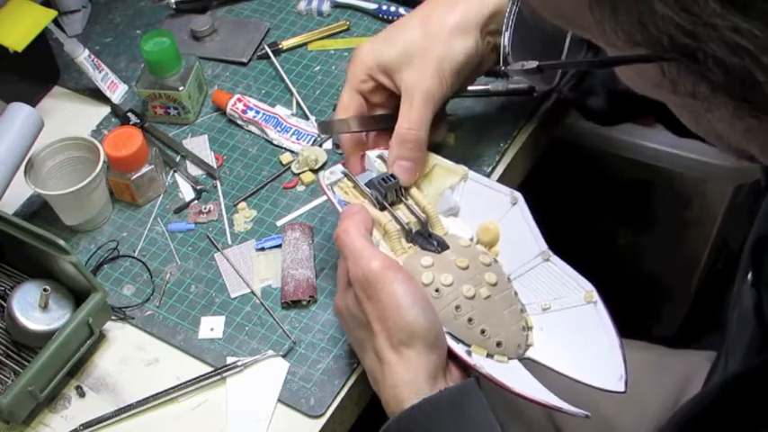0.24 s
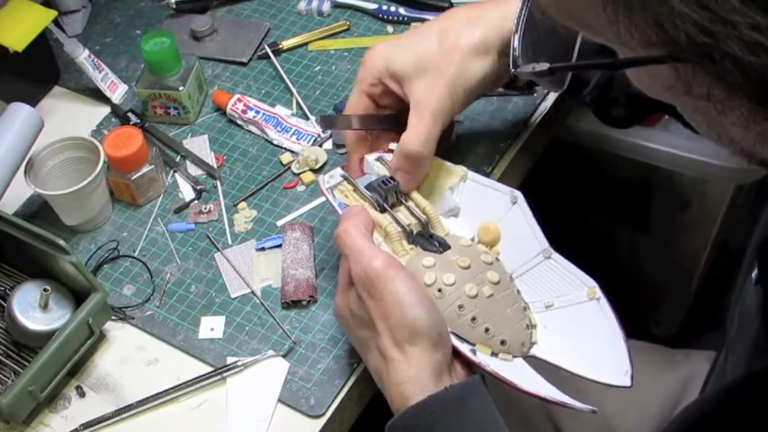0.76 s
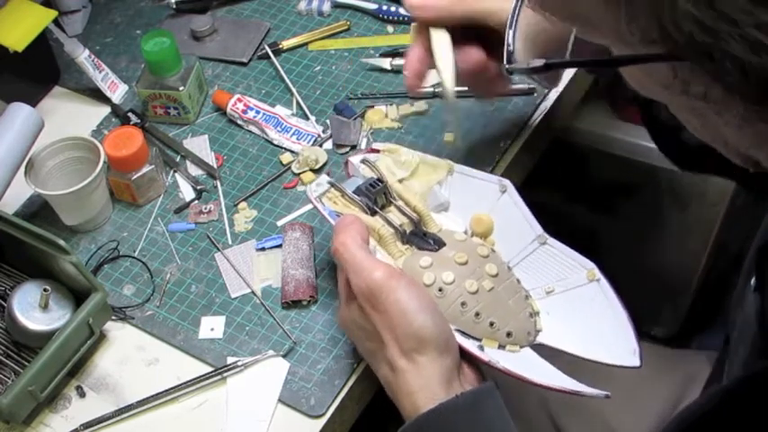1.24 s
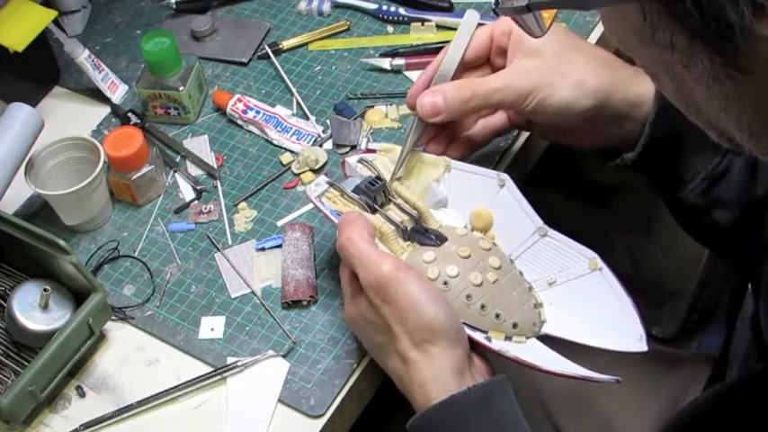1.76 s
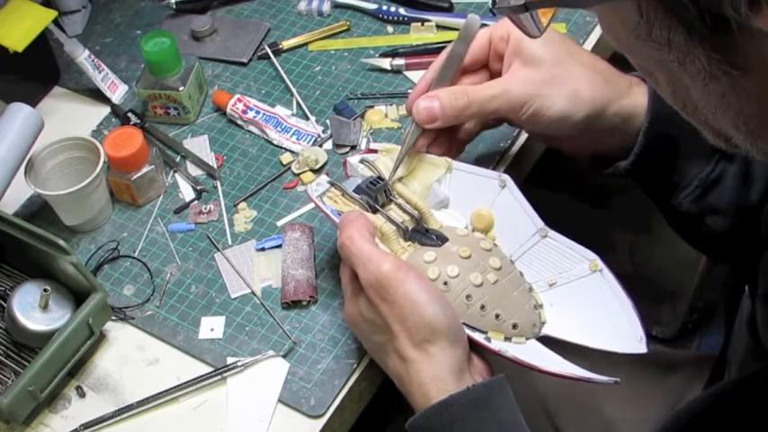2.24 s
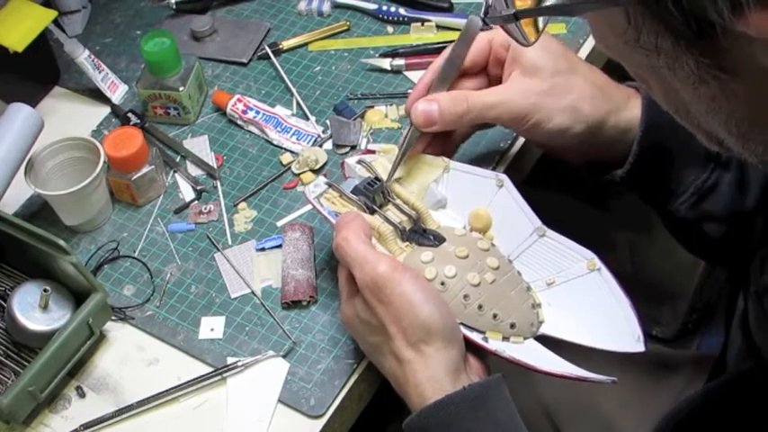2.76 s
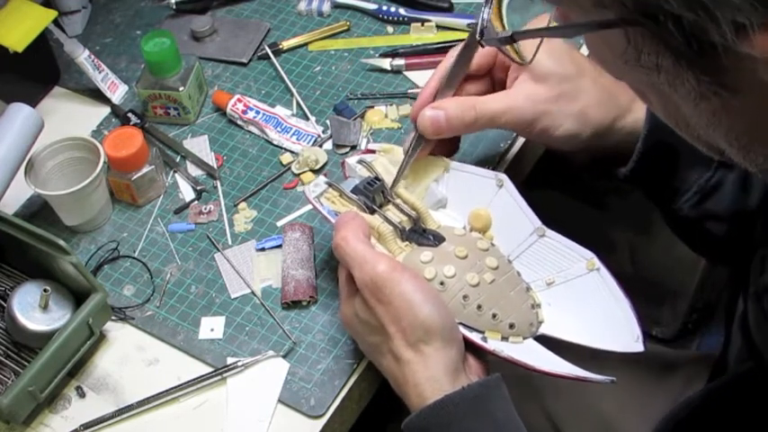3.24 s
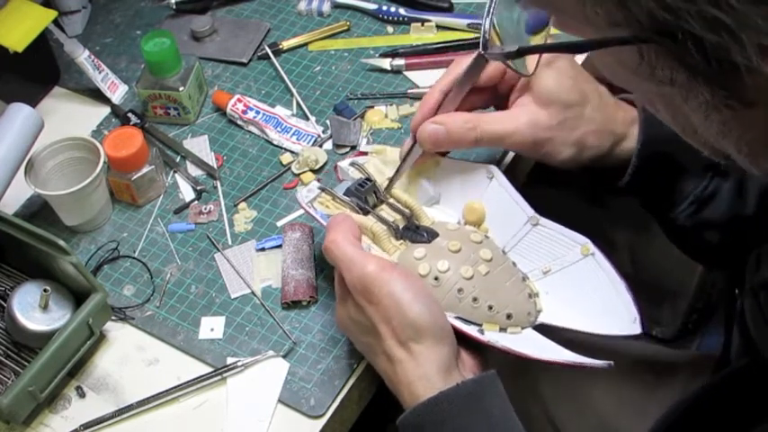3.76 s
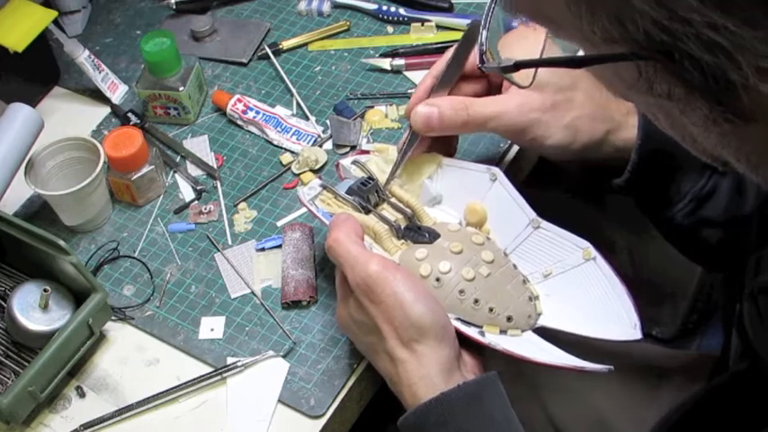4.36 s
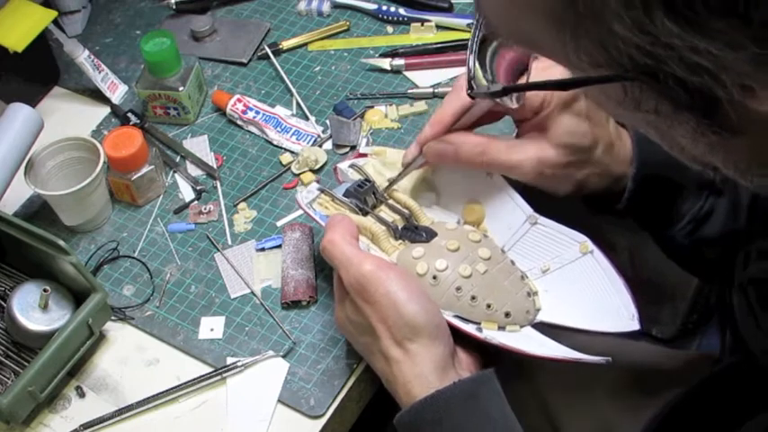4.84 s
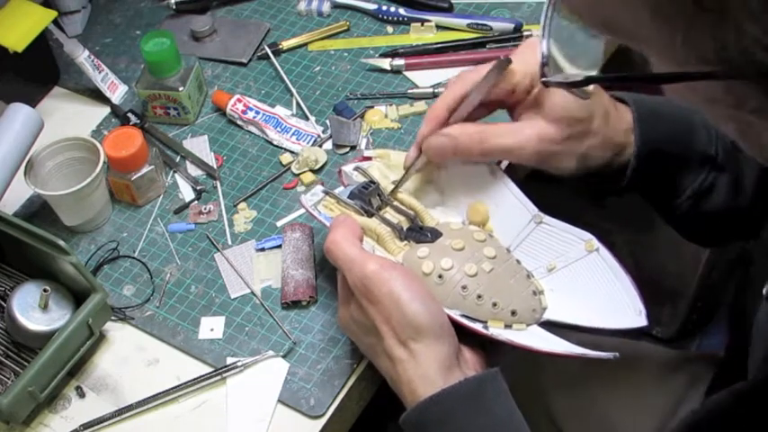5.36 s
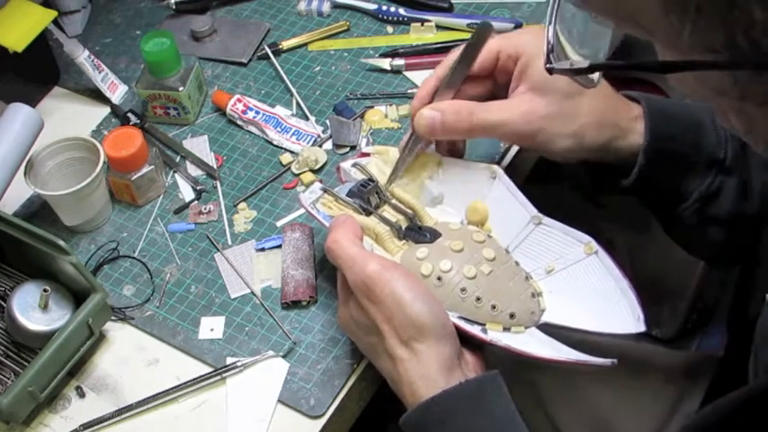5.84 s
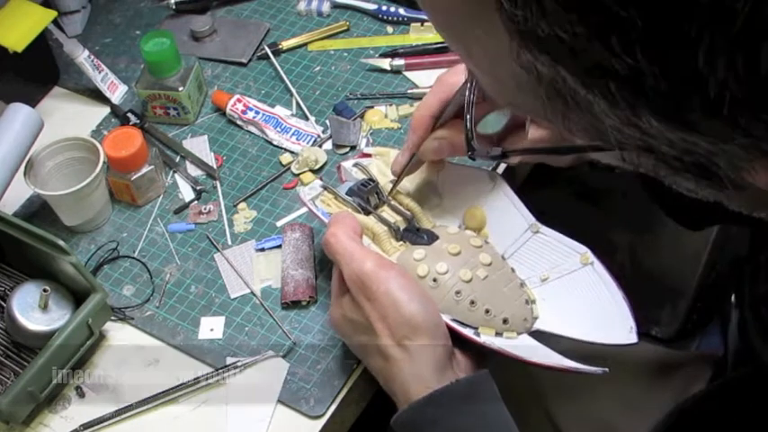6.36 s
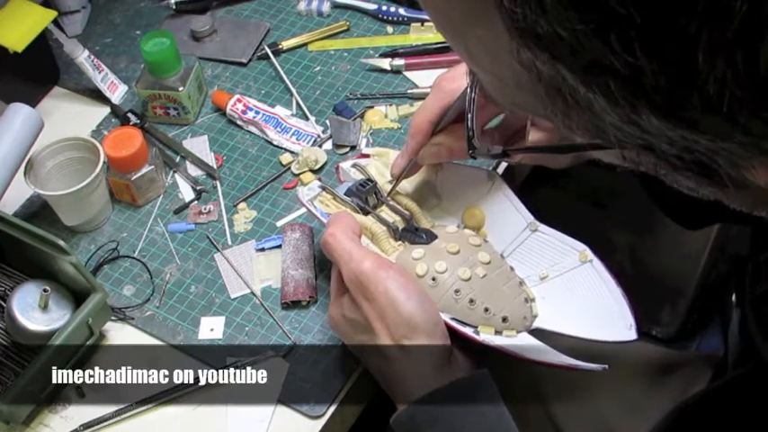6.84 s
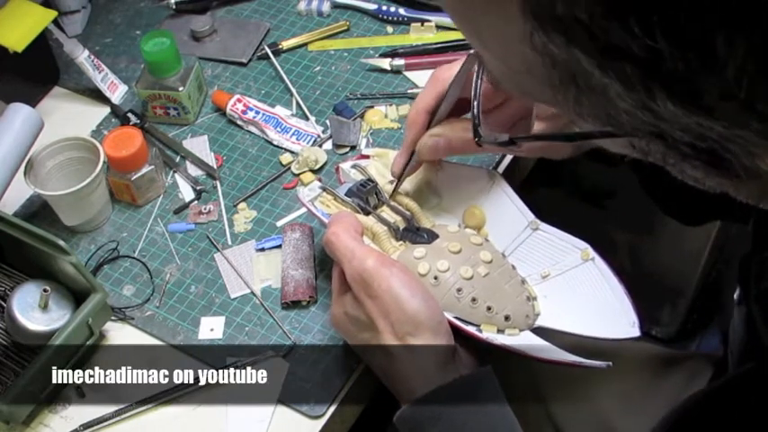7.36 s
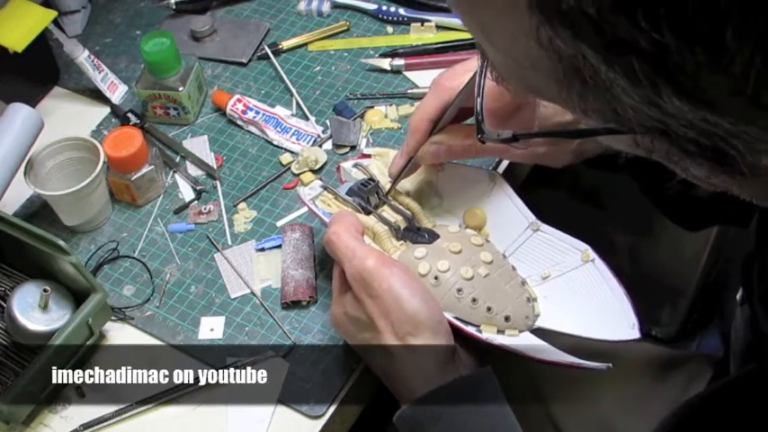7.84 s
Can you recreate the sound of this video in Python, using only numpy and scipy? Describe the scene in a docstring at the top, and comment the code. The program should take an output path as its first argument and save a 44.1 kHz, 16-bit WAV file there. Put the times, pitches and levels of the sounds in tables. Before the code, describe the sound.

Close, dry tweezer taps on a thin plastic shell, scattered and irregular, with one loud rattling burst near the end over low room hum.

```python
"""A quiet room hums, rumbles and hisses, with a thin throbbing whistle near the top of hearing.
Soon steel tweezers tap and nudge a hollow plastic model held over a desk.
Each contact is a short rough force that rings the shell and the steel, with a noisy crack and near echoes.
Fingers, tips and cloth rub faintly: uneven slips ring the shell, and cloth is a bright hiss.
Some contacts also thump the desk, a soft push that rings its low modes."""
import sys
import numpy as np
from scipy import signal
from scipy.io import wavfile

SR = 44100
rng = np.random.default_rng(int(sys.argv[2]) if len(sys.argv) > 2 else 0)


def dump(signal):
    """Clip the signal to [-1, 1] and save it as 16-bit WAV at the path in sys.argv[1]."""
    limited = np.clip(np.atleast_2d(signal).T, -1, 1)
    pcm = np.round(limited * 32767).astype(np.int16)
    wavfile.write(sys.argv[1], SR, pcm)


N = 357165   # length in samples

# Room noise colour, relative between bands: f/Hz, level per Hz/dB
ROOM_COLOUR = [(60, -25), (85, -11), (130, -3.5), (200, -3), (305, -5), (450, -6.5), (800, -10.5),
               (1150, -14), (2200, -24), (4320, -27.5), (9000, -29.5), (14000, -32.5), (15500, -40),
               (17000, -42)]
# How alike left and right are in the room noise: f/Hz, likeness (1 same, 0 unrelated, below 0 opposed)
ROOM_LIKENESS = [(60, 1), (110, 0.97), (200, 0.73), (380, -0.52), (700, -0.6), (1290, -0.21), (2380, 0.47),
                 (4400, 0.24), (8120, 0.083), (15000, -0.031)]
# Deep rumble that swells and sinks: t/s, level/dB
RUMBLE_LEVEL = [(0.0, -62), (0.34, -56), (1.2, -58.5), (1.58, -56), (1.8, -64), (2.14, -52), (2.4, -56),
                (2.95, -63), (3.74, -53), (4.35, -65), (4.9, -58), (5.32, -56), (5.89, -58), (6.56, -62),
                (6.95, -64), (7.26, -56), (7.67, -65), (8.1, -57)]
# Low hum tones, most of them multiples of the 50 Hz mains: f/Hz, rms level/dB
HUM_TONES = [(50, -59.5), (100, -66.5), (150, -67.5), (200, -77.5), (300, -67.5), (525, -80.5)]
# Tweezer contacts: t/s, shell level/dB, then crack, bright edge and low modes (each level/dB
# relative to the shell), favoured shell pitch f/Hz, contact time/s
CONTACTS = [(0.178, -54, 3, -13.5, 4, 1560, 0.017), (0.699, -50.5, -1, 0, -11, 2630, 0.0072),
            (0.944, -43.5, -16, -28, -1, 2640, 0.01), (0.954, -38, -4.5, -25, -5, 2350, 0.0039),
            (0.964, -38, -26, -8, -11, 1790, 0.0036), (1.639, -48.5, -13, -10, -3, 1030, 0.006),
            (1.998, -52, -12, -2, -2, 1020, 0.021), (2.306, -60, 9.5, 10, -4, 805, 0.012),
            (2.631, -42.5, -26, -23, -7, 1070, 0.0058), (2.654, -51.5, -16, -16, 2, 2470, 0.012),
            (2.824, -43, -18, 3, -5, 1040, 0.012), (2.831, -43.5, 1, -4, 0, 1800, 0.02),
            (2.873, -50.5, 2, 0, -11, 1220, 0.036), (3.41, -44.5, -0.5, -9, 0, 1090, 0.012),
            (3.434, -39.5, -9, -22, -0.5, 950, 0.0065), (3.926, -60, 7, -3, -5, 2080, 0.022),
            (4.2, -51.5, -6, -6, 1, 1020, 0.0056), (4.602, -39, 7.5, -2.5, -11, 1180, 0.01),
            (4.763, -48.5, 4.5, 3, -9, 2500, 0.0076), (4.864, -26, 2, -2.5, -11.5, 1650, 0.0054),
            (5.114, -22.5, -4.5, -14, -8.5, 1280, 0.01), (5.344, -19, 0.5, -9, -8, 1630, 0.013),
            (5.587, -47, -13, -16, -6, 1070, 0.012), (5.607, -53, 5, -1.5, -5, 1070, 0.015),
            (5.627, -45.5, 0, -13.5, -13, 1920, 0.018), (5.649, -48.5, -6, -16, -8, 1090, 0.013),
            (5.685, -46.5, -1, -15, -11, 1790, 0.012), (5.729, -48.5, -4.5, -5.5, 6.5, 1770, 0.0088),
            (6.03, -37, 14, 8, -4.5, 1500, 0.024), (6.04, -34, 9.5, -30, -10, 2720, 0.02),
            (6.069, -39, -4, 3, -18, 1050, 0.0063), (6.293, -48.5, 5.5, -8.5, -12, 1890, 0.018),
            (7.066, -17.5, -11, -1.5, -3, 1100, 0.015), (7.069, -15, 4, 4.5, -14, 2580, 0.0036),
            (7.076, -20, 3, -1, -4, 1030, 0.017), (7.115, -20, -0.5, 0, 1, 940, 0.0048),
            (7.124, -29, 8.5, 3.5, 6, 1800, 0.017), (7.352, -37.5, 3, -7, -3, 1060, 0.016),
            (7.704, -56, -4, -12, -5, 2140, 0.015), (7.785, -57, -9.5, -11.5, -2, 1770, 0.014),
            (7.818, -51, -13, -13, -5, 1020, 0.0092), (7.895, -53.5, 2, -3.5, 4, 2150, 0.016),
            (8.011, -44.5, 0.5, -19, -3, 1020, 0.0098), (8.058, -43.5, 3, -9, -7, 1150, 0.011)]
# Ringing modes of the plastic shell: f/Hz, relative level/dB, time to fall 60 dB/s
SHELL_MODES = [(424, -10.5, 0.13), (540, -1, 0.083), (563, -33, 0.16), (827, -14.5, 0.19),
               (1012, -11, 0.16), (1096, 0.5, 0.071), (1500, -39, 0.032), (1690, -33, 0.06),
               (1795, -9.5, 0.14), (1890, -0.5, 0.036), (1964, -3.5, 0.049), (2144, 0, 0.04),
               (2418, 2, 0.017), (2680, -12, 0.17), (3400, -19, 0.021)]
# Ringing modes of the tweezers, damped by the fingers: f/Hz, relative level/dB, time to fall 60 dB/s
STEEL_MODES = [(4530, 2.5, 0.036), (5180, -0.5, 0.038), (5460, -24, 0.066), (6730, -5.5, 0.046),
               (8230, -25, 0.041), (9100, -37, 0.026), (10880, 0, 0.063), (12140, -23, .04)]
# Fingers and tips rubbing the shell: peak t/s, peak level/dB
SHELL_RUBS = [(0.948, -47.5), (3.928, -57), (4.08, -57.5), (4.318, -57.5), (5.65, -58), (5.686, -56),
              (6.3, -51), (7.9, -53)]
# Cloth brushing: peak t/s, peak level/dB
CLOTH_RUBS = [(1.092, -65), (1.412, -62), (1.496, -73)]
# Contacts that reach the desk: t/s, level/dB, depth/dB per octave (above 0 favours the low modes)
DESK_THUMPS = [(4.862, -51, 1), (5.115, -44.5, -8), (5.343, -49.5, 14), (6.029, -51, 4), (6.068, -53, -0.5),
               (7.066, -37, -5), (7.07, -31.5, -2), (7.076, -30, -11), (7.115, -35.5, -12), (7.124, -37, 0),
               (7.352, -49, -2), (3.434, -58, -8), (8.012, -57, -2)]
# Ringing modes of the desk: f/Hz, relative level/dB, time to fall 60 dB/s
DESK_MODES = [(68.8, 0.5, 0.28), (119.5, 2.5, 0.34), (168.6, -7, 0.25), (221.7, -5.5, 0.15)]

ROOM_DB, ROOM_PATCHY_DB = -53.5, 1.1
WHISTLE_HZ, WHISTLE_DB = 15734, -69.5   # level before the beat and the dip
WHISTLE_BEAT_HZ, WHISTLE_BEAT_DEPTH, WHISTLE_BEAT_PEAK_S = 13.51, 0.5, 0.069
WHISTLE_DIP_S, WHISTLE_DIP_WIDTH_S, WHISTLE_DIP_DB = 6.05, 0.13, -15   # the whistle sinks away once
FAINT_TONE_HZ, FAINT_TONE_DB = 6480, -85
ECHO_T60_S, ECHO_PER_CONTACT = 0.1, 2.9   # near echoes last longer after a longer touch
RUB_RISE_DB_PER_S, RUB_FALL_DB_PER_S = 500, 248
CLOTH_RISE_DB_PER_S, CLOTH_FALL_DB_PER_S = 150, 300
THUMP_CUT_HZ = 44   # the thumps lose their deepest bass below this
CUTOFF_HZ = 17100   # the top is fully cut from here up


def from_db(db):
    """Turn decibels into gain."""
    return 10 ** (np.asarray(db) / 20)


def rms_one(x):
    """Scale a sound to an rms level of 1."""
    return x / np.sqrt(np.mean(x ** 2) + 1e-20)


def band(x, low, high):
    """Keep mainly the pitches between two frequencies."""
    return signal.sosfilt(signal.butter(2, [low, high], "band", fs=SR, output="sos"), x)


def at_hz(points, hz):
    """Read a table at one frequency, in straight lines on a log-frequency axis."""
    table_hz, value = np.transpose(points)
    return np.interp(np.log(hz), np.log(table_hz), value)


def drift(rate_hz):
    """Slow random wandering with a typical size of 1, made every 40 samples and joined by lines."""
    r = np.exp(-80 * np.pi * rate_hz / SR)
    noise = rng.standard_normal(N // 40 + 2002)
    slow = signal.lfilter([1], [1, -2 * r, r * r], noise)[2000:]   # skip the filter's start
    return np.interp(np.arange(N) / 40, np.arange(len(slow)), rms_one(slow))


def spread(mid, side, alike):
    """Make left and right from two noises: what they share, plus what they hold in opposite signs."""
    alike = np.clip(alike, -1, 1)
    shared = np.sqrt((1 + alike) / 2) * mid
    opposed = np.sqrt((1 - alike) / 2) * side * [[1], [-1]]
    return shared + opposed


def level(rows):
    """Gain over time from rows of time and decibels."""
    s, level_db = np.transpose(rows)
    return from_db(np.interp(np.arange(N) / SR, s, level_db))


def swells(rows, rise_db, fall_db):
    """Gain that climbs to each peak and falls away at steady decibels per second."""
    t = np.arange(N) / SR
    gain = 0
    for s, db in rows:
        below_peak_db = np.where(t < s, rise_db * (s - t), fall_db * (t - s))
        gain = gain + from_db(db - below_peak_db)
    return gain


def octaves(modes, hz):
    """How many octaves each mode lies above a pitch."""
    return np.log2(np.array(modes)[:, 0] / hz)


def ring(force, modes, weights_db):
    """Drive ringing modes side by side with one force; each is a decaying tone with its own weight."""
    out = 0
    for (hz, level_db, t60), weight_db in zip(modes, weights_db):
        r = from_db(-60 / (t60 * SR))   # loss per sample
        w = 2 * np.pi * hz / SR
        mode = signal.lfilter([0, np.sin(w)], [1, -2 * r * np.cos(w), r * r], force)
        out = out + from_db(level_db + weight_db) * mode
    return out


def room_noise(patchy_db):
    """Half-octave bands of stereo noise, each wavering a little, over a deep rumble."""
    out = 0
    edges = 85 * 2 ** np.arange(0, 8.1, .5)
    white = rng.standard_normal((2, 2, N))
    for k, (low, high) in enumerate(zip(edges, edges[1:])):
        hz = np.sqrt(low * high)
        gain = from_db(at_hz(ROOM_COLOUR, hz) + patchy_db * drift(8.8))
        mid, side = band(white[k % 2], low, min(high, .45 * SR))   # neighbours use separate noises
        out = out + gain * spread(mid, side, at_hz(ROOM_LIKENESS, hz))
    bed = from_db(ROOM_DB) * out / np.std(out.mean(axis=0))
    rumble = rms_one(band(white[1, 0], 40.3, 90))
    return bed + level(RUMBLE_LEVEL) * rumble


def tones():
    """Sine tones: a wavering low hum, a throbbing whistle and a faint wavering tone below it."""
    t = np.arange(N) / SR
    hum = 0
    for hz, db in HUM_TONES:
        gain = from_db(db + 1.6 * drift(3.1))
        hum = hum + gain * np.sin(2 * np.pi * (hz * t + rng.random()))
    beat = 1 + WHISTLE_BEAT_DEPTH * np.cos(2 * np.pi * WHISTLE_BEAT_HZ * (t - WHISTLE_BEAT_PEAK_S))
    dip_db = WHISTLE_DIP_DB * np.exp(-((t - WHISTLE_DIP_S) / WHISTLE_DIP_WIDTH_S) ** 2)
    whistle = from_db(WHISTLE_DB + dip_db) * beat * np.sin(2 * np.pi * WHISTLE_HZ * t)
    faint = from_db(FAINT_TONE_DB + 2 * drift(8)) * np.sin(2 * np.pi * FAINT_TONE_HZ * t)
    return np.sqrt(2) * (hum + whistle + faint)   # turns rms levels into sine peaks


def tap(shell_db, crack_db, edge_db, boom_db, shell_hz, contact_s):
    """One contact: a rough force rings shell and steel, with a noisy crack and its near echoes."""
    t = np.arange(SR // 4) / SR
    noise = rng.standard_normal((3, 2, len(t)))

    # the touch sets in quickly and fades, with grip and slip about a millisecond at a time
    touch = (1 - np.exp(-t / 0.00068)) * np.exp(-(t / contact_s) ** 2)
    slips = np.repeat(rng.standard_normal(len(t) // 40 + 1), 40)[:len(t)]
    touch = touch * from_db(1.4 * slips)
    force = 0.76 * rms_one(noise[0, 0] * touch) / np.sqrt(len(t))
    force[20] += .6   # the first hard strike

    # the struck spot favours modes near its centre; modes below 700 Hz get their own level
    spot_db = -10.5 * octaves(SHELL_MODES, shell_hz) ** 2
    spot_db = np.where(octaves(SHELL_MODES, 700) < 0, boom_db, spot_db)
    luck_db = rng.normal(0, 1.5, len(SHELL_MODES))
    shell = from_db(-4) * ring(force, SHELL_MODES, spot_db + luck_db)
    scatter_db = rng.normal(0, 2.5, len(STEEL_MODES))
    steel = from_db(-16.0) * ring(force, STEEL_MODES, scatter_db)

    # echo power builds during the touch, then dies
    echo_t60 = ECHO_T60_S + ECHO_PER_CONTACT * contact_s
    keep = from_db(-120 / (echo_t60 * SR))   # 120 because this is power
    echo_power = signal.lfilter([1], [1, -keep], 0.68 * touch ** 2)
    fade = np.sqrt(echo_power / np.sum(touch ** 2))
    snap = fade + touch * (0.15 + 2.65 * np.exp(-t / 0.0028))   # direct sound stands above the echoes

    low = band(noise[0], shell_hz / 2, shell_hz + 1000)
    middle = band(noise[1], 2800, 8500)
    high = band(noise[2], 7500, 16000)
    shell_colour = rms_one(ring(noise[0], SHELL_MODES, spot_db))
    low = low + 0.5 * np.std(low) * shell_colour   # the echoes carry the shell's colour
    echoes = from_db(4.5) * fade * spread(*low, 0.96)
    crack = from_db(crack_db) * (steel + from_db(-8.0) * snap * spread(*middle, 1.0))
    edge = from_db(edge_db - 6.0) * snap * spread(*high, 0.38)
    edge = edge * from_db([[-1.5], [1.5]])   # a little stronger on the right
    return from_db(shell_db) * (shell + echoes + crack + edge)


def taps():
    """Place every tweezer contact at its time; overlapping sounds add up."""
    out = np.zeros((2, N + SR))
    for s, *how in CONTACTS:
        sound = tap(*how)
        start = round(s * SR)
        out[:, start:start + sound.shape[1]] += sound
    return out[:, :N]


def rubs():
    """Dense uneven slips excite the shell; cloth gives a fine bright hiss."""
    slips = rng.standard_normal(N) * from_db(3 * drift(60))
    shell = rms_one(ring(slips, SHELL_MODES, -9.0 * octaves(SHELL_MODES, 1650) ** 2))
    cloth = rms_one(band(rng.standard_normal((2, N)), 8500, 14500))
    shell_gain = swells(SHELL_RUBS, RUB_RISE_DB_PER_S, RUB_FALL_DB_PER_S)
    cloth_gain = swells(CLOTH_RUBS, CLOTH_RISE_DB_PER_S, CLOTH_FALL_DB_PER_S)
    return shell * shell_gain + cloth * cloth_gain


def thumps():
    """Some contacts give the desk a soft 5 ms push, which rings its low modes."""
    t = np.arange(SR // 2) / SR
    out = np.zeros(N + SR)
    push = np.sin(np.pi * np.minimum(t / .005, 1)) ** 2 / (.0015 * SR)
    for s, db, depth_db in DESK_THUMPS:
        start = round(s * SR)
        weights_db = -depth_db * octaves(DESK_MODES, 125)
        # the tiny offset is far too small to hear
        out[start:start + len(t)] += from_db(db) * ring(push + 1e-18, DESK_MODES, weights_db)
    return signal.sosfilt(signal.butter(2, THUMP_CUT_HZ, "high", fs=SR, output="sos"), out[:N])


def scene():
    """Add the room, the contacts, the rubbing and the desk together."""
    return room_noise(ROOM_PATCHY_DB) + tones() + taps() + rubs() + thumps()


def record(dry):
    """The microphone drops the deepest bass; the top is cut steeply."""
    heard = signal.sosfilt(signal.butter(4, 40, "high", fs=SR, output="sos"), dry)
    return signal.sosfilt(signal.cheby2(12, 70, CUTOFF_HZ, fs=SR, output="sos"), heard)


dry = scene()
out = record(dry)
dump(out)
```